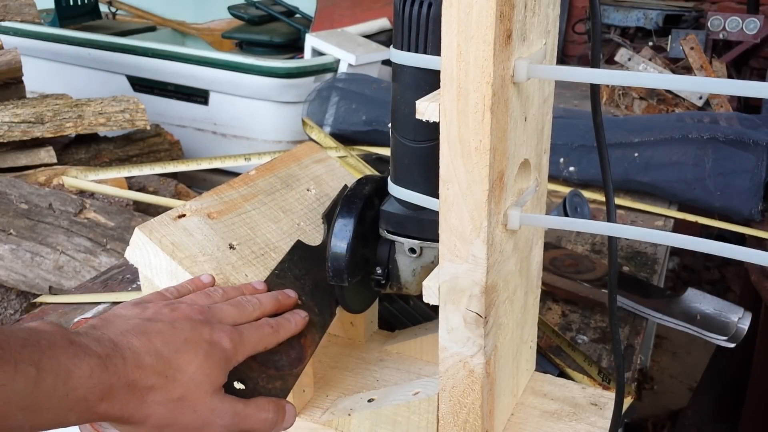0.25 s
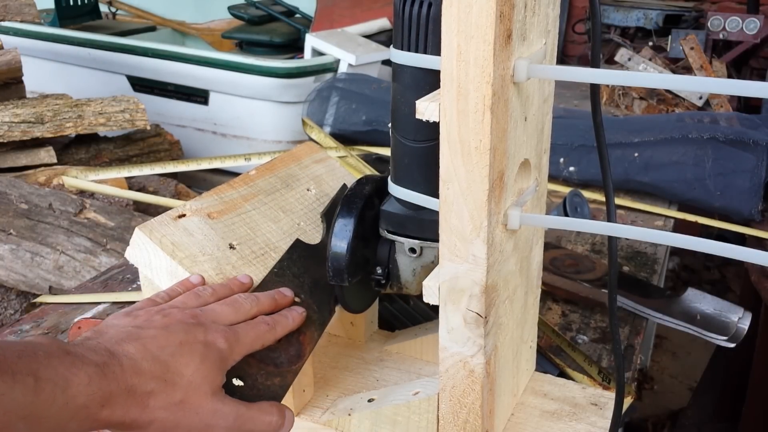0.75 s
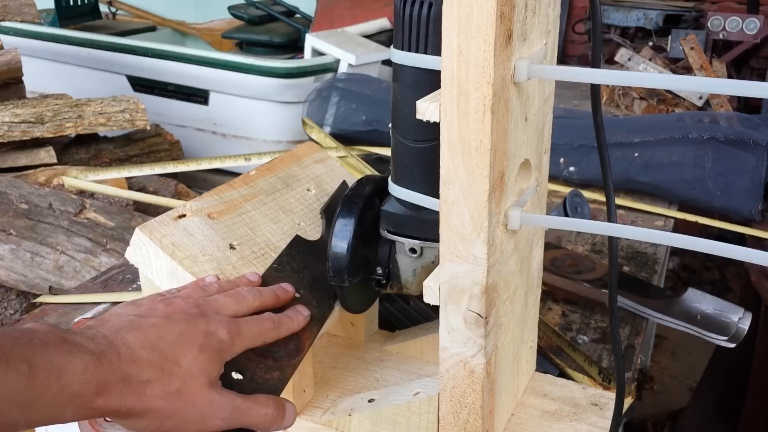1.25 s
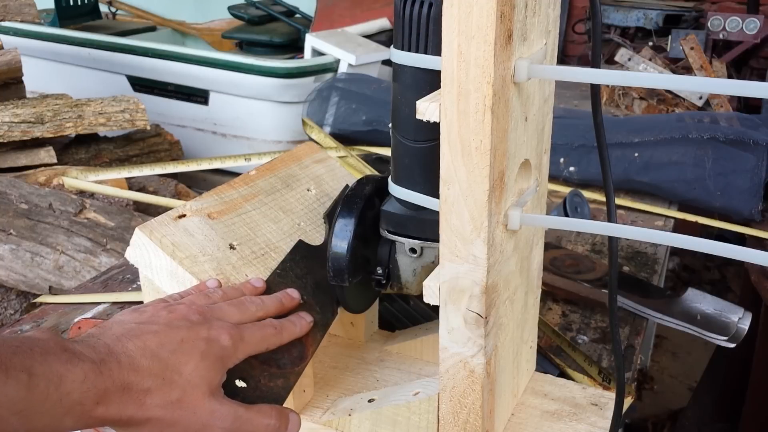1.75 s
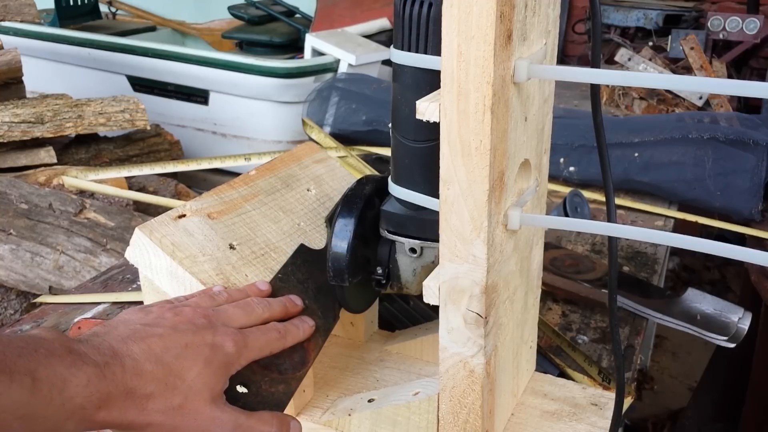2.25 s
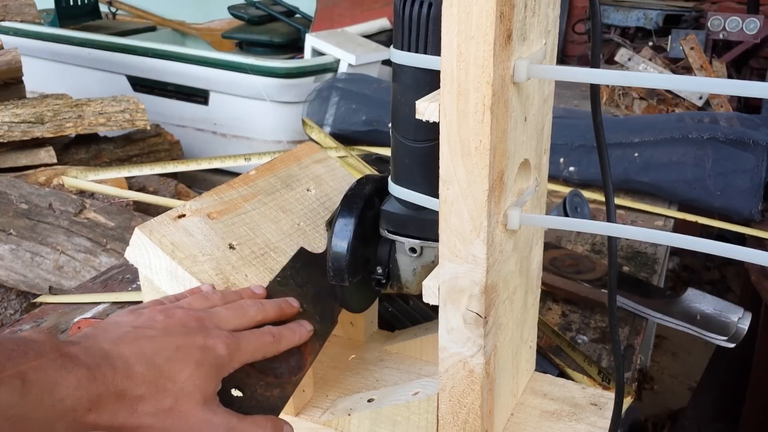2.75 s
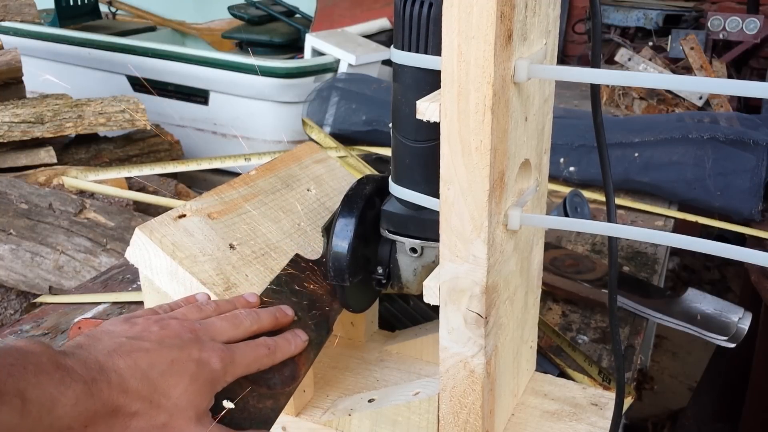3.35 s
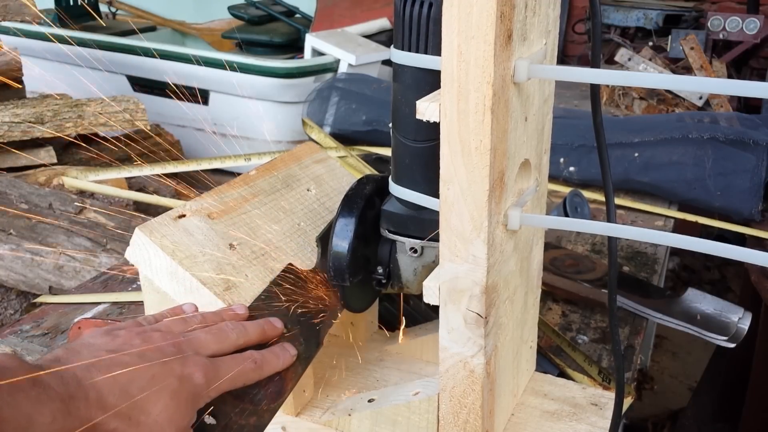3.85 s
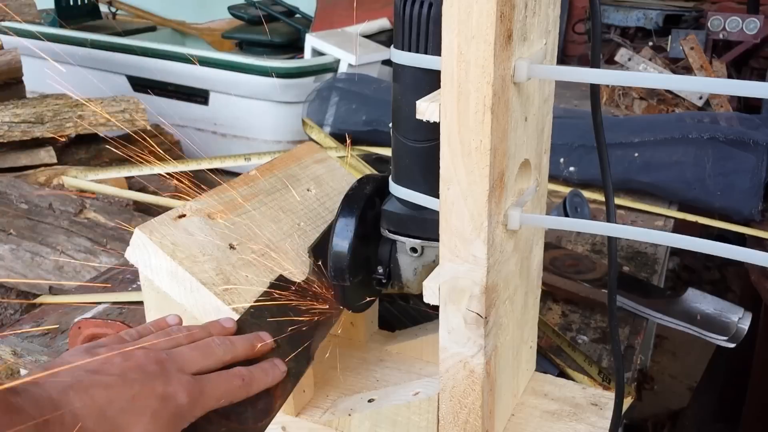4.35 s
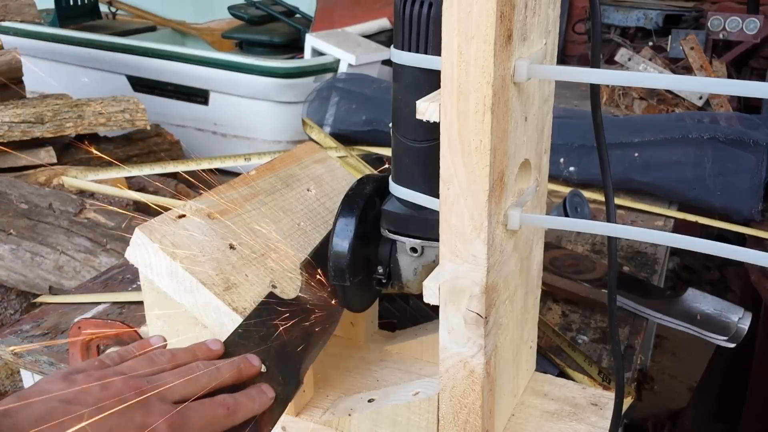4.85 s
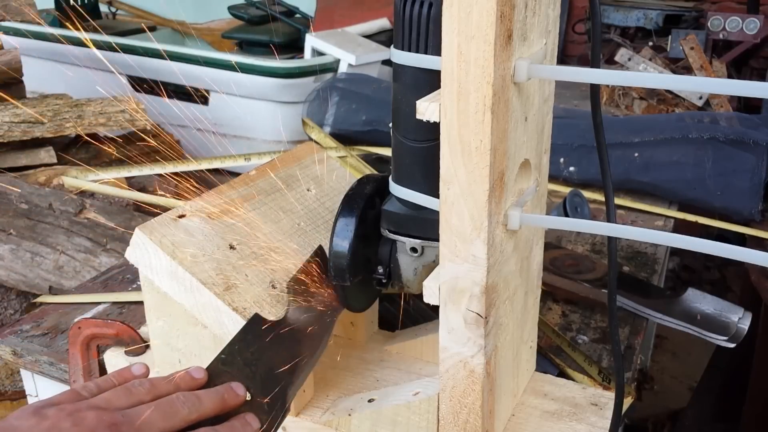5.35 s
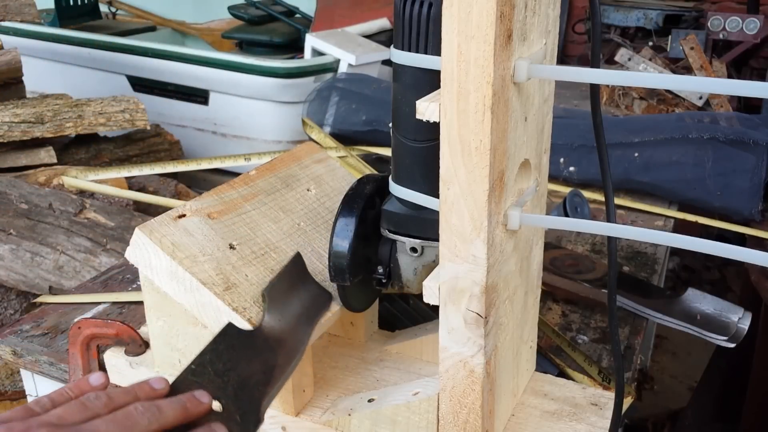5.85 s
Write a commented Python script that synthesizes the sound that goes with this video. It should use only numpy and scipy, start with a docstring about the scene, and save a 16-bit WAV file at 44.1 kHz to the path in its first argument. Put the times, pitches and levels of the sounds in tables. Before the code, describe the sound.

An angle grinder runs steadily close by in a work area, with a low hum, rattling gears and a whining rush of air. About halfway through, a steel mower blade touches the wheel with a brief screech. It is then ground for about two seconds, a shrill, ringing scrape with short squeals and a faint bump or two. The blade lifts and the grinder keeps running.

```python
"""A cluttered work area. An angle grinder strapped to a wooden stand runs free: the unbalanced wheel
hums, the gears rattle, the fan blows. A steel mower blade touches the wheel briefly, then is ground
for two seconds and bumps its rest. The wheel bites once a turn and rings the blade, whose leading
mode changes as the contact slides along the edge and at times catches in a squeal.
Automatic gain control ducks the machine while the steel screams."""
import sys
import numpy as np
from scipy import signal
from scipy.fft import rfft, irfft, next_fast_len
from scipy.io import wavfile
from scipy.ndimage import uniform_filter1d, minimum_filter1d, map_coordinates

SR = 44100
rng = np.random.default_rng(int(sys.argv[2]) if len(sys.argv) > 2 else 0)


def to_wav(s):
    """Save 16-bit WAV."""
    ch = np.atleast_2d(s).T  # columns
    pcm = np.round(np.clip(ch, -1, 1) * 32767)  # PCM
    wavfile.write(sys.argv[1], SR, pcm.astype(np.int16))


N = 269451
T = np.arange(N) / SR

# Table levels are relative; place runs 0-1 along the blade's edge.
# wheel speed: t/s, f/Hz
WHEEL_SPEED = [(0, 132.3), (0.5, 133.2), (1, 134.2), (1.5, 135.1), (2, 136.1), (2.5, 136.8), (2.85, 136.3),
               (3.2, 137.8), (3.5, 138.3), (3.9, 137.7), (4.25, 137.1), (4.6, 138.0), (5, 138.8),
               (5.5, 138.8), (5.8, 140.2), (6.11, 141.8)]
# unbalance hum: wheel order, level/dB
HUM_ORDERS = [(1, -2.5), (2, -13)]
# third wheel harmonic: t/s, level/dB
THIRD_HARMONIC = [(0, -47.5), (2.5, -49.5), (2.95, -54), (3.6, -56.5), (5.6, -65), (5.85, -50)]
# fan rush: f/Hz, left/dB, right/dB
RUSH_SPECTRUM = [(25, -112, -106), (92, -82.5, -77), (217, -73, -79.5), (363, -75.5, -66.5),
                 (533, -69, -69), (770, -67.5, -72.5), (1104, -67.5, -74.5), (1360, -74.5, -62),
                 (1827, -62, -62.5), (2160, -72.5, -64), (3050, -91, -99), (6000, -120, -120)]
# stand and wheel guard: f/Hz, width/Hz, left/dB, right/dB
STAND_MODES = [(574, 120, -89, -101), (813, 33, -71, -63), (930, 55, -59, -58), (1766, 60, -69, -73)]
# gears running looser or tighter: t/s, rattle/dB, housing ring/dB
GEAR_PLAY = [(0, -23, -27.5), (.2, -22.2, -40), (.6, -22.7, -34), (1.05, -22.3, -36), (1.17, -22.2, -27.5),
             (1.4, -22.2, -30), (1.65, -22.2, -26.5), (2.05, -22.2, -29), (2.8, -21.7, -25.5),
             (2.92, -21.3, -39), (3.3, -22, -35), (3.6, -22, -37), (4.2, -21, -29), (5.0, -23.5, -33.5),
             (5.75, -21.7, -28.5), (6.11, -22, -29.5)]
# hard clacks: t/s, level/dB
GEAR_CLACKS = [(1.1635, -7), (1.1794, 0), (1.628, -9), (1.6621, -13), (1.7088, -3), (1.7664, -6)]
# gear rattle: f/Hz, left/dB, right/dB
RATTLE_SPECTRUM = [(1160, -110, -110), (2280, -67, -75.5), (2465, -57.5, -60), (2870, -60, -55.5),
                   (3210, -60.5, -59.5), (3370, -53, -59), (3600, -57, -56.5), (3700, -55.5, -54.5),
                   (4680, -53, -53.5), (5370, -55.5, -61.5), (6050, -59, -63), (6900, -64.5, -58),
                   (8870, -79.5, -62), (13800, -100, -78.5), (14200, -102, -78.5), (16000, -115, -100)]
# gear housing, main mode first: f/Hz, width/Hz, left/dB, right/dB
HOUSING_MODES = [(3734, 30, -51.5, -52), (2495, 45, -63, -52.5), (2800, 120, -52.5, -54),
                 (3237, 60, -56, -52.5), (4115, 100, -57, -48.5), (4440, 130, -58, -55),
                 (5012, 50, -51, -57), (7690, 60, -72, -58), (8800, 120, -78, -61)]
# swells of gear rasp: t/s, half length/s, f/Hz, level/dB
RASP_SWELLS = [(0.664, 0.11, 4520, -27), (1.58, 0.092, 4450, -31), (2.5, .12, 4200, -47),
               (3.03, 0.12, 4100, -36)]
# vent air: t/s, f/Hz, level/dB
VENT_HISS = [(0, 7300, -29.5), (.3, 7700, -39), (.7, 7920, -34), (1.2, 8340, -33), (1.8, 8120, -37),
             (2.4, 8100, -32.5), (3.1, 7400, -28.5), (3.35, 7340, -43), (5.7, 7550, -28), (6.11, 7350, -39)]
# blade on wheel: start/s, end/s, firmness/dB
BLADE_CONTACTS = [(2.606, 2.768, -7.5), (2.78, 2.842, -9), (2.936, 2.948, -14.5), (3.414, 3.438, -4),
                  (3.475, 3.652, -2.5), (3.677, 5.631, 0), (5.673, 5.688, -2)]
# hand guiding the blade: t/s, pressure/dB, place
HAND_PATH = [(2.62, -3.5, 0.07), (2.8, 5.5, 0.19), (3.45, -1.5, 0.14), (3.75, -3.5, 0.27), (4.0, -4, 0.34),
             (4.25, -1, 0.4), (4.6, -4.5, 0.44), (4.8, -4.5, 0.57), (4.93, -3.5, 0.76), (5.15, -1.5, 0.81),
             (5.25, -3, 0.84), (5.33, -1.5, 0.8), (5.62, 1, 0.78), (5.7, 0.5, 0.75)]
# weaker blade modes: f/Hz, width/Hz, left/dB, right/dB, best place, loss one edge length away/dB
WEAK_MODES = [(5040, 90, -45, -49, .33, 26), (6464, 30, -43, -43, .38, 28), (6560, 90, -57, -54, .5, 18),
              (6910, 50, -66, -55, .3, 18), (7150, 200, -58, -45, 0, 90), (7690, 40, -60, -39, .28, 45),
              (8150, 240, -58, -42, 0, 80), (8480, 60, -80, -55, .6, 22), (8880, 130, -68, -44, .3, 50),
              (9398, 40, -68, -43, .65, 30), (9550, 240, -67, -44, .03, 80),
              (10290, 100, -72, -53.5, .3, 13), (10700, 50, -74, -57, .3, 18),
              (11275, 40, -69, -50, .08, 40), (11672, 45, -68, -50, .34, 26),
              (12200, 140, -70, -54.5, .25, 14), (13290, 80, -80, -62, .7, 5),
              (13900, 130, -82, -65, .6, 5), (14440, 70, -82, -60, .5, 34), (14960, 90, -78, -57.5, .9, 20),
              (15130, 120, -82, -63, .27, 36)]
# grit on steel: f/Hz, left/dB, right/dB
SCRAPE_SPECTRUM = [(1490, -86, -95), (2660, -69, -67), (4600, -64.5, -82), (5150, -54, -57.5),
                   (5840, -62.5, -66), (6900, -63, -57.5), (8600, -88, -59), (9300, -69, -56),
                   (10900, -78, -63), (12300, -80, -68), (15100, -100, -69), (16000, -116, -110)]
# skidding grit: t/s, half length/s, f/Hz, level/dB
GRIT_SKIDS = [(2.69, .06, 7400, -24), (2.73, .12, 8000, -22.5), (2.72, .1, 9550, -32),
              (2.76, .13, 6080, -21.5), (5.35, .1, 8960, -23), (5.52, .1, 5950, -22.5),
              (5.52, .1, 5400, -27)]
# leading blade modes: f/Hz, width/Hz, left/dB, right/dB
LEADING_MODES = [(6097, 75, 6, -5), (7556, 34, -14, 5), (7850, 50, -13, 3), (8895, 110, -17, 5)]
# drive of each: level/dB, best place, spacing of best places, loss between/dB, tilt along edge/dB
LEADING_DRIVE = [(-23.2, 0.66, 2.0, 11, -1), (-13.4, 0.32, 0.64, 17, -4), (-18, 0, 1.3, 12, -4),
                 (-31, 0.97, 0.41, 11, 16)]
# squeals: start/s, end/s, leading mode index, level/dB
BLADE_SQUEALS = [(2.632, 2.72, 0, -24), (2.722, 2.86, 0, -15), (3.98, 4.05, 1, -19), (4.2, 4.29, 1, -18),
                 (5.262, 5.44, 3, -21), (5.313, 5.385, 1, -18), (5.452, 5.54, 0, -18.5),
                 (5.6, 5.622, 0, -20)]
# blade against its rest: t/s, level/dB
REST_BUMPS = [(2.8, -17.5), (3.88, -27), (5.373, -19.5)]

GEAR_RATIO, FAN_BLADES = 45 / 17, 19  # rotor turns per wheel turn; fan on the rotor


def amp(db):
    """Decibels to gain."""
    return 10 ** (np.asarray(db) / 20)


def unit(x):
    """x at rms 1."""
    return x / np.sqrt(np.mean(x ** 2) + 1e-20)


def curves(rows):
    """Per-sample values of each column after the time."""
    times, *columns = np.transpose(rows)
    return [np.interp(T, times, column) for column in columns]


def wobble(rate_hz):
    """Smooth random curve with knots at rate_hz."""
    coarse = T[::24]
    knots = rng.standard_normal(int(N * rate_hz / SR) + 4)
    return np.interp(T, coarse, map_coordinates(knots, [coarse * rate_hz]))


def filtered(x, response):
    """x through a complex frequency response."""
    size = next_fast_len(N + SR // 2)
    return irfft(rfft(x, size) * response(np.fft.rfftfreq(size, 1 / SR)), size)[..., :N]


def band(hz, centre_hz, half_hz):
    """Gain of a steep band; a low-pass if centred on 0."""
    return 1 / (1 + ((hz - centre_hz) / half_hz) ** 4)


def coloured(x, spectrum):
    """x through a left and a right spectrum, interpolated on log frequency."""
    knots_hz, *sides = np.transpose(spectrum)
    return filtered(x, lambda hz: amp([np.interp(np.log(hz + 1), np.log(knots_hz), s) for s in sides]))


def rung(x, modes, skirt_widths=1000):
    """x through stereo resonances that fall steeply beyond the skirt."""
    def response(hz, mode_hz, width_hz, left_db, right_db):
        peak = 1j * hz * width_hz / (mode_hz ** 2 - hz ** 2 + 1j * hz * width_hz)
        return amp([[left_db], [right_db]]) * peak * band(hz, mode_hz, skirt_widths * width_hz)
    return filtered(x, lambda hz: sum(response(hz, *mode) for mode in modes))


def noise(alike, blur_hz=7000):
    """Stereo white noise, less correlated towards the treble."""
    def mix(hz):
        angle = np.arccos(alike / (1 + (hz / blur_hz) ** 2)) / 2
        return np.array([np.cos(angle), np.sin(angle)])
    mid, side = filtered(rng.standard_normal((2, N)), mix)
    return np.array([mid + side, mid - side])


def blows(events, t60_s):
    """Envelope that jumps at each event and decays."""
    return sum(amp(db - 60 * np.abs(T - at_s) / t60_s) * (T >= at_s) for at_s, db in events)


def tone(turns, order, waver_db):
    """Shaft-locked sine of rms near 1, wavering in level."""
    level = np.sqrt(2) * amp(waver_db * wobble(8.3))
    return level * np.sin(2 * np.pi * order * turns + rng.uniform(0, 2 * np.pi))


def clutter(x, echo_db=-10, t60_s=0.14, cutoff_hz=5000):
    """x plus brief, dull echoes off the stand and nearby clutter."""
    t = T[:SR // 8]
    echoes = rng.standard_normal((2, len(t))) * amp(-60 * t / t60_s) * (t > .002)
    echoes /= np.linalg.norm(echoes, axis=1, keepdims=True)
    wet = signal.fftconvolve(x, echoes, axes=1)[:, :N]
    return x + amp(echo_db) * filtered(wet, lambda hz: band(hz, 0, cutoff_hz))


def motor(wheel_hz, turns, boom_hz=372.8, boom_width_hz=18):
    """Unbalanced wheel and rotor hum; the rotor nears a stand resonance; the fan rushes and whines."""
    wheel = sum(amp(db) * tone(turns, round(order), waver_db=0.66) for order, db in HUM_ORDERS)
    hum = amp(-40.5) * wheel * amp([[.3], [-.2]])
    shake = 1 / np.hypot(1, 2 * (GEAR_RATIO * wheel_hz - boom_hz) / boom_width_hz)
    rotor = amp(-43.5) * shake ** 2.35 * tone(turns + 0.031 * wobble(40), GEAR_RATIO, waver_db=2.0)
    load = uniform_filter1d(contact(), size=4000)
    harmonics = amp(curves(THIRD_HARMONIC)[0]) * tone(turns, order=3, waver_db=0.5)
    harmonics += amp(-52 + 2.5 * load) * tone(turns, order=4, waver_db=-2.5)
    harmonics += amp(-56 + load) * tone(turns, order=7, waver_db=5.0)
    rush_gain = amp(-34.5 + 2.1 * wobble(4.616))
    rush = rush_gain * unit(clutter(coloured(noise(alike=0.58, blur_hz=2880), RUSH_SPECTRUM)))
    stand = amp(-44) * unit(shake ** 1.1 * rung(noise(alike=0.97), STAND_MODES))
    fan_rad = 2 * np.pi * FAN_BLADES * GEAR_RATIO * turns
    whine = amp(-36.5 + 0.66 * wobble(23.0)) * np.sin(fan_rad + np.array([wobble(30), wobble(30)]))
    return hum + rotor + harmonics + rush + stand + whine


def tooth_load(turns, torque_pulse_hz=120):
    """Load cycles with both shafts, the torque pulses and the rotor's beat against the wheel."""
    cycles = [(0.065, turns / 2), (0.05, turns), (0.08, GEAR_RATIO * turns),
              (0.06, torque_pulse_hz * T), (0.06, (3 - GEAR_RATIO) * turns)]
    ripple = sum(depth * np.sin(2 * np.pi * (phase + rng.random())) for depth, phase in cycles)
    return unit(np.exp(ripple))


def chatter(rate_hz=600, decay_s=0.0016, spread_db=3, rub_power=0.96):
    """Force of loose teeth: short random knocks over a steady rub."""
    knocks = (rng.random(N) < rate_hz / SR) * amp(-spread_db * rng.random(N)) ** 2
    power = signal.lfilter([1], [1, -np.exp(-1 / (decay_s * SR))], knocks)
    return unit(np.sqrt(rub_power + power / power.mean()))


def sustained(ring):
    """Friction-driven mode: capped swing, nearly even strength."""
    ring = unit(ring)
    analytic = signal.hilbert(ring, next_fast_len(N))[:, :N]
    swing = np.sqrt(np.mean(np.abs(analytic) ** 2, axis=0))
    return unit(ring / np.hypot(.45, swing))


def gears(turns):
    """Chattering teeth rattle the gear case and keep its main mode singing."""
    rattle_db, ring_db = curves(GEAR_PLAY)
    load = tooth_load(turns)
    teeth = load * chatter()
    force = amp(rattle_db + 0.14 * wobble(70)) * teeth + amp(-23) * blows(GEAR_CLACKS, t60_s=0.035)
    body = coloured(force * noise(alike=1.0, blur_hz=6170), RATTLE_SPECTRUM)
    rings = rung(force * noise(alike=0.85, blur_hz=7500), HOUSING_MODES[1:], skirt_widths=1.8)
    main_mode = HOUSING_MODES[0]
    flutter = amp(2.2 * wobble(110)) * unit(load ** 3)
    whine = flutter * sustained(rung(teeth * noise(alike=0.8, blur_hz=12000), [main_mode]))
    song = amp(ring_db) * unit(filtered(whine, lambda hz: band(hz, main_mode[0], half_hz=190)))
    rattle = unit(clutter(body) + rings) * np.sqrt(np.mean(force ** 2))
    return rattle + song + teeth * swells(RASP_SWELLS, half_hz=280)


def vents():
    """Narrow hiss of cooling air, wandering in pitch."""
    centre_hz, db = curves(VENT_HISS)
    air = unit(filtered(rng.standard_normal((2, N)), lambda hz: band(hz, 0, half_hz=420)))
    return amp(db) * amp([[-13], [3]]) * air * np.sin(2 * np.pi * np.cumsum(centre_hz) / SR)


def swells(rows, half_hz):
    """Narrow bands of rasp rise and sink."""
    rasp = unit(filtered(noise(alike=0.85), lambda hz: band(hz, 0, half_hz)))
    carriers = sum(amp(db) * np.exp(-((T - at_s) / half_s) ** 2) * np.sin(2 * np.pi * hz * T)
                   for at_s, half_s, hz, db in rows)
    return np.sqrt(2) * rasp * carriers


def contact(attack_s=0.016, release_db_per_s=330):
    """Grip of blade on wheel: builds, holds, dies as the blade lifts."""
    grips = [np.clip((T - start) / attack_s, 0, 1) * amp(db - release_db_per_s * np.maximum(T - end, 0))
             for start, end, db in BLADE_CONTACTS]
    return np.max(grips, axis=0)


def bites(turns, depth_db=22, miss_db=12, ring_s=0.0007):
    """The wheel's high spot grips once a turn, at times only grazing; the steel rings on briefly."""
    miss = rng.random(int(turns[-1]) + 1)[turns.astype(int)] ** 2
    angle = 2 * np.pi * (turns + 0.05 * wobble(110))
    grip = (1 + np.tanh(-2.6 * np.cos(angle))) / 2
    force = amp((depth_db - miss_db * miss) * grip)
    return unit(np.sqrt(signal.lfilter([1], [1, -np.exp(-1 / (ring_s * SR))], force ** 2)))


def shimmer(rub, place, wander_db=2.2, bend=0.0013):
    """Weaker modes fade away from their best places; the hand's clamping bends their pitch."""
    ring = np.zeros((2, N))
    for *mode, best, loss_db in WEAK_MODES:
        gain = amp(wander_db * wobble(13) - loss_db * np.abs(place - best))
        ring += gain * rung(rub, [mode], skirt_widths=3.0)
    read_at = np.arange(N) + np.cumsum(bend * wobble(14))
    return unit(np.array([map_coordinates(side, [read_at]) for side in ring]))


def scream(bite, throb, place, gain_db=3):
    """Friction sustains the leading modes; the place of contact picks the strongest."""
    out = np.zeros((2, N))
    for (db, best, spacing, loss_db, tilt_db), mode in zip(LEADING_DRIVE, LEADING_MODES):
        mode_hz, _, *sides_db = mode
        drive_db = db + tilt_db * place - loss_db * np.sin(np.pi * (place - best) / spacing) ** 2
        ring = sustained(rung(bite * noise(alike=0.77, blur_hz=25000), [mode]))
        song = filtered(ring * throb, lambda hz: band(hz, mode_hz, half_hz=240))
        strength = np.sqrt(np.mean(amp(sides_db) ** 2))
        out += amp(drive_db + gain_db + 0.41 * wobble(40)) * strength * song
    return out


def grinding(turns):
    """Each bite drags grit over the steel and rings it; heavy pressure shakes the rest."""
    pressure_db, place = curves(HAND_PATH)
    force = contact() * amp(pressure_db + 0.66 * wobble(45))
    bite = bites(turns)
    grit = unit(bite + 0.27) * noise(alike=0.62)
    rub = unit(bite + 0.76) * noise(alike=0.68)
    throb = unit(np.abs(uniform_filter1d(bite, size=110)) + 0.057)
    steel = amp(-17.5) * shimmer(rub, place)
    steel += amp(-21.3) * unit(coloured(grit, SCRAPE_SPECTRUM))
    skids = bite * swells(GRIT_SKIDS, half_hz=300)
    steel += coloured(skids, [(5800, 1, 0), (7500, -16, 2)])  # higher skids lie to the right
    steel += scream(bite, throb, place)
    shudder = unit(filtered(noise(alike=0.43), lambda hz: (hz / 80) ** 3 / (1 + (hz / 80) ** 6)))
    return force * steel + force ** 0.17 * squeals(throb) + force ** 3 * amp([[-72], [-57]]) * shudder


def squeals(throb, catch_s=0.0074, drift_hz=32, pulse_share=0.7):
    """A caught mode locks into a nearly pure tone that sings on between bites."""
    out = np.zeros((2, N))
    offset_hz = drift_hz * wobble(140)
    for start, end, index, db in BLADE_SQUEALS:
        hz, _, *sides_db = LEADING_MODES[index]
        caught = (np.tanh((T - start) / catch_s) - np.tanh((T - end) / catch_s)) / 2
        pan = unit(amp(sides_db))[:, None]
        out += pan * amp(db) * caught * np.sin(2 * np.pi * np.cumsum(hz + offset_hz) / SR)
    return out * np.sqrt(2) * unit(1 - pulse_share + pulse_share * throb)


def bumps(knock_hz=120, highpass_hz=70):
    """The blade knocks dully on its wooden rest."""
    knocks = sum(blows([(at_s, db)], t60_s=0.028) * np.sin(2 * np.pi * knock_hz * (T - at_s))
                 for at_s, db in REST_BUMPS)
    return amp([[-6], [1]]) * filtered(knocks, lambda hz: 1j * hz / (highpass_hz + 1j * hz))


def gain_control(x, treble_hz=9500, threshold_db=-40, slope=0.45, slow_share=0.68):
    """Loud treble ducks everything at once; part of the gain springs back, the rest creeps."""
    treble = filtered(x, lambda hz: hz > treble_hz)
    power = np.abs(uniform_filter1d(np.mean(treble ** 2, axis=0), size=1300))
    cut_db = np.maximum(slope * (10 * np.log10(power + 1e-12) - threshold_db), 1e-6)

    def held_db(release_s):
        return np.exp(np.maximum.accumulate(np.log(cut_db) + T / release_s) - T / release_s)
    return x * amp(-slow_share * held_db(release_s=0.42) - (1 - slow_share) * held_db(release_s=0.028))


def scene():
    """Grinder and blade, slightly to the right, so the left side lags."""
    wheel_hz, = curves(WHEEL_SPEED)
    turns = np.cumsum(wheel_hz) / SR
    left, right = motor(wheel_hz, turns) + gears(turns) + vents() + grinding(turns) + bumps()
    lag_s = 5.2e-5
    return np.array([filtered(left, lambda hz: np.exp(-2j * np.pi * hz * lag_s)), right])


def record(dry):
    """Gain control, peak limiter, band limit."""
    limit_db, top_hz = -5.6, 15720
    ducked = gain_control(dry)
    needed = np.minimum(1, amp(limit_db) / (np.abs(ducked).max(axis=0) + 1e-9))
    gain = uniform_filter1d(minimum_filter1d(needed, size=260), size=200)
    return filtered(ducked * gain, lambda hz: hz < top_hz)


dry = scene()
out = record(dry)
to_wav(out)
```